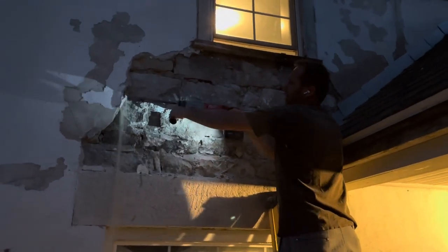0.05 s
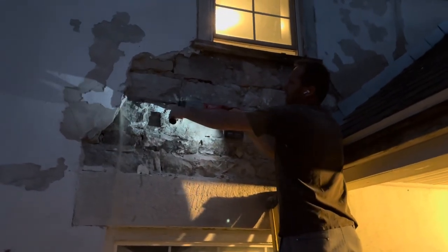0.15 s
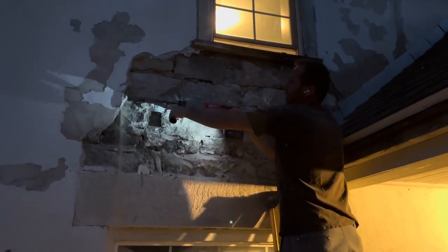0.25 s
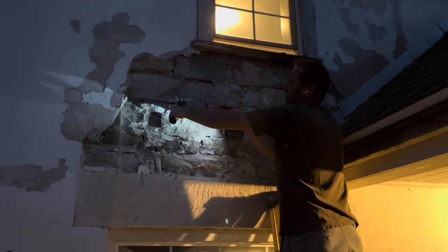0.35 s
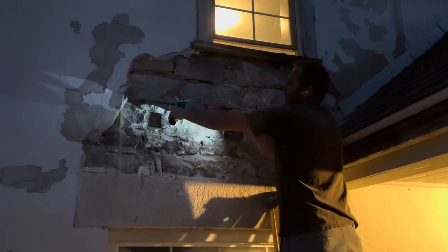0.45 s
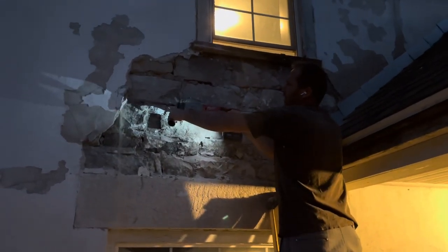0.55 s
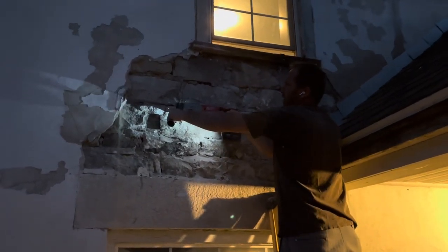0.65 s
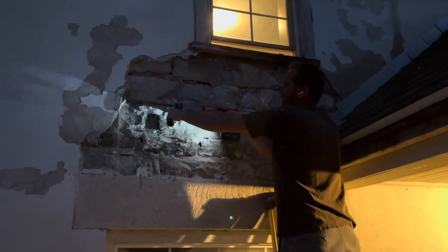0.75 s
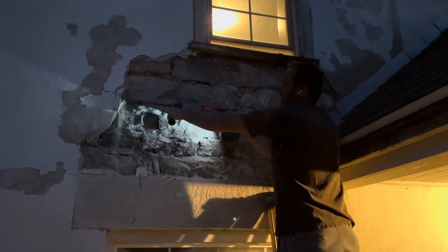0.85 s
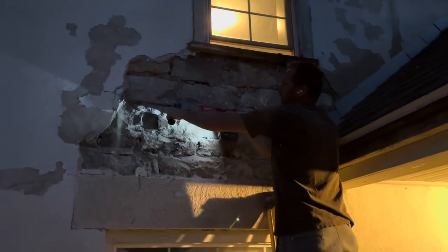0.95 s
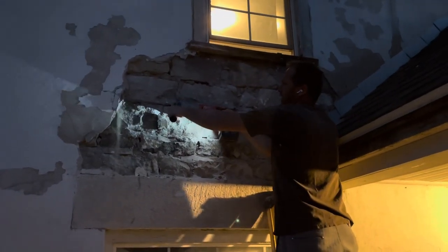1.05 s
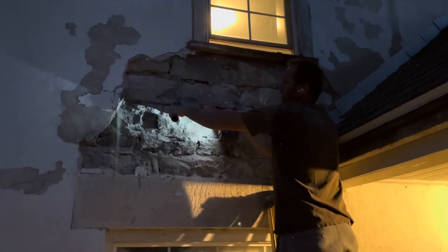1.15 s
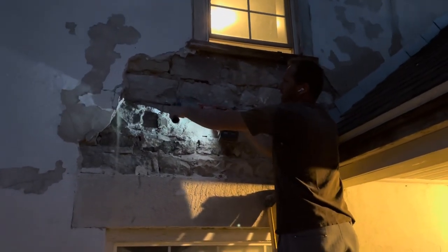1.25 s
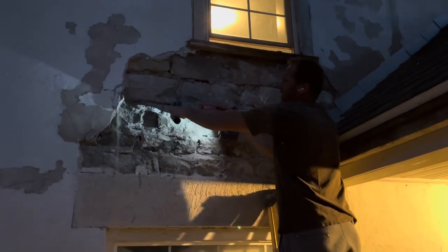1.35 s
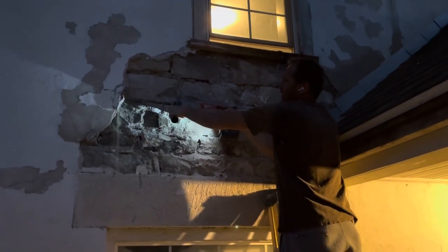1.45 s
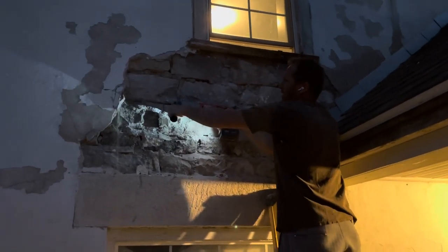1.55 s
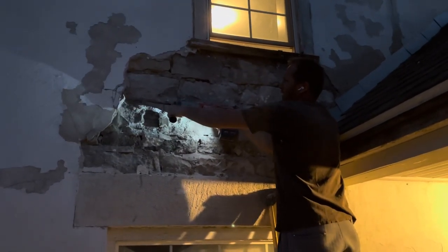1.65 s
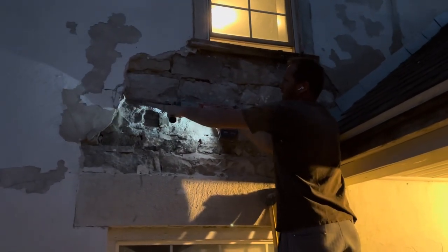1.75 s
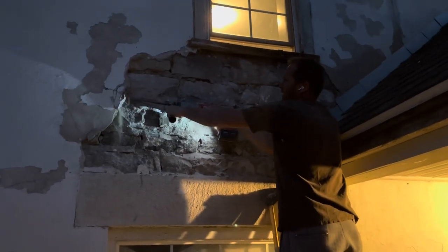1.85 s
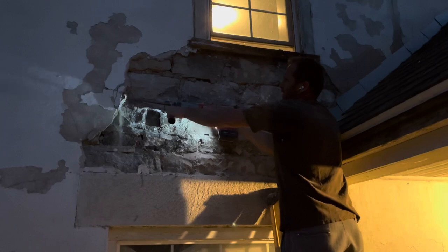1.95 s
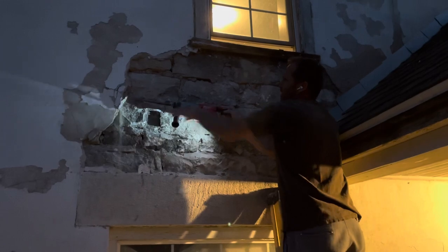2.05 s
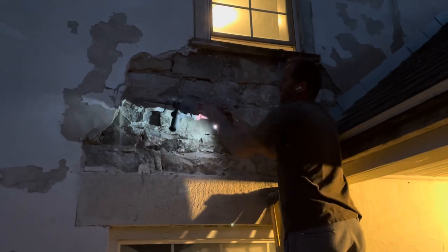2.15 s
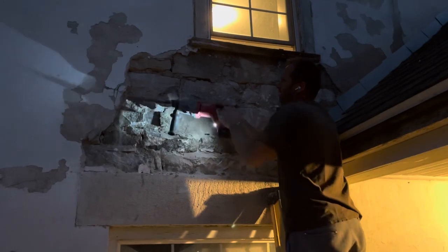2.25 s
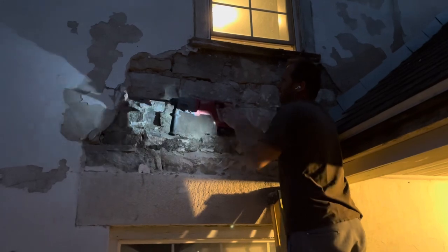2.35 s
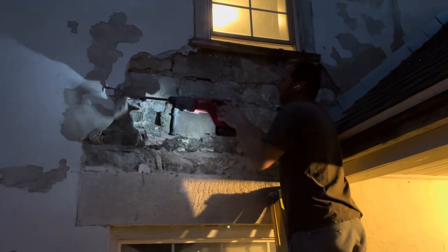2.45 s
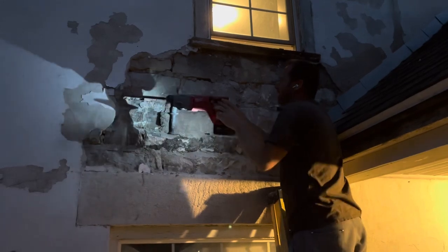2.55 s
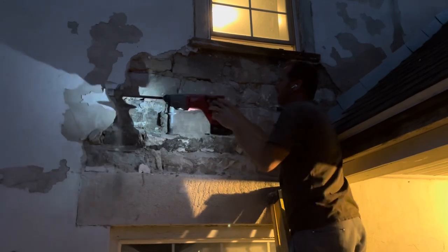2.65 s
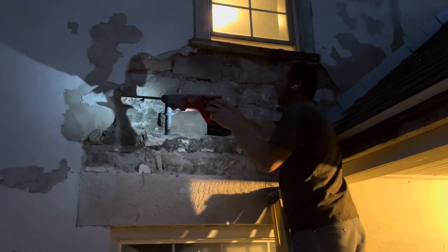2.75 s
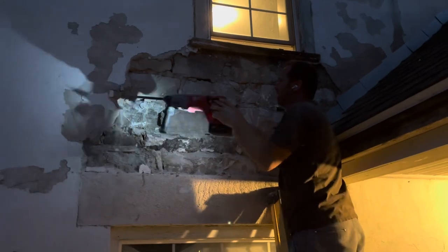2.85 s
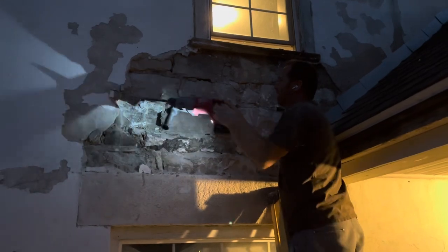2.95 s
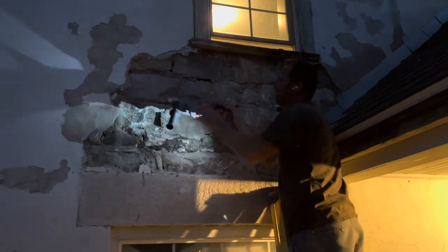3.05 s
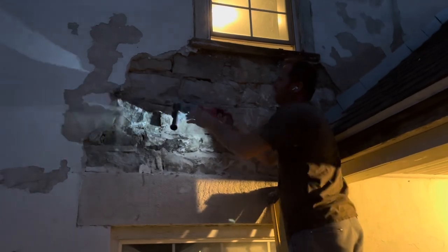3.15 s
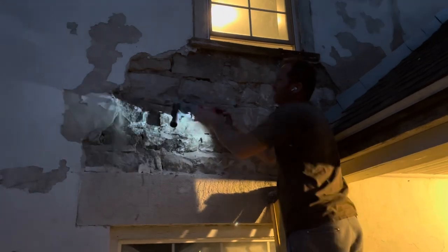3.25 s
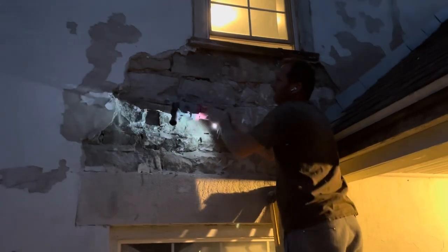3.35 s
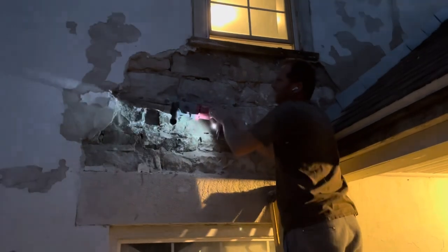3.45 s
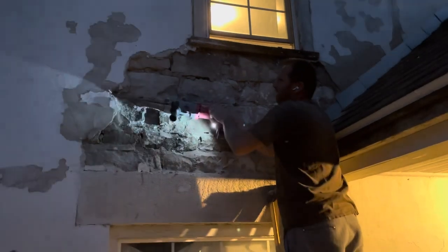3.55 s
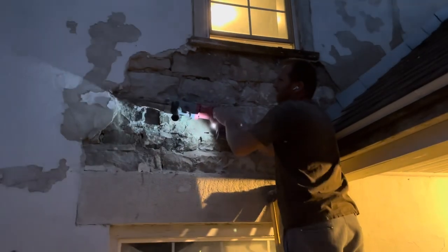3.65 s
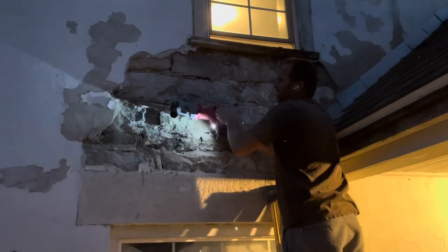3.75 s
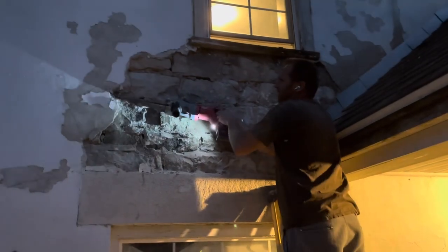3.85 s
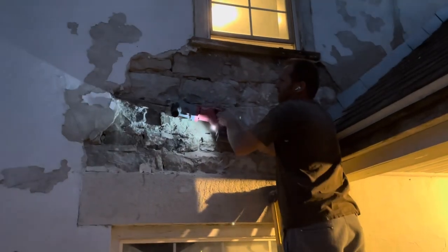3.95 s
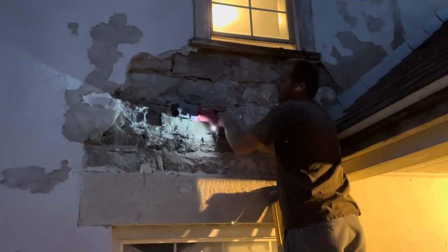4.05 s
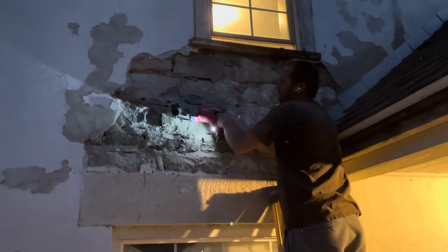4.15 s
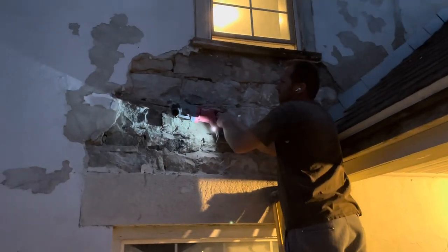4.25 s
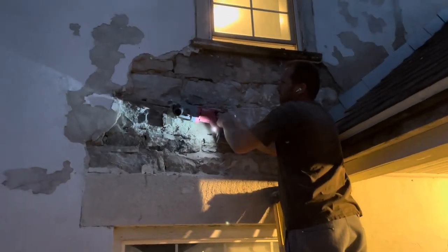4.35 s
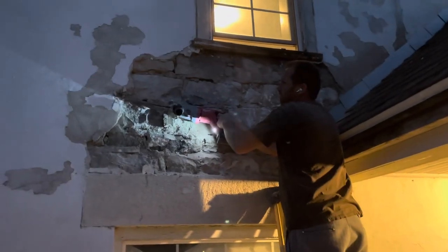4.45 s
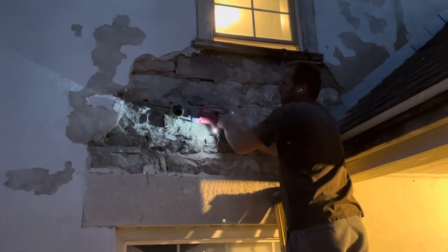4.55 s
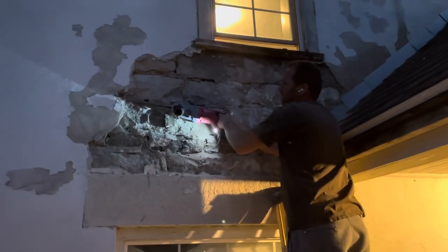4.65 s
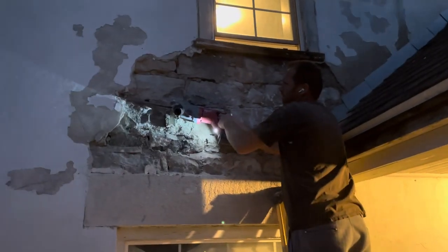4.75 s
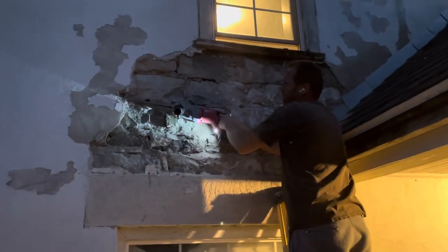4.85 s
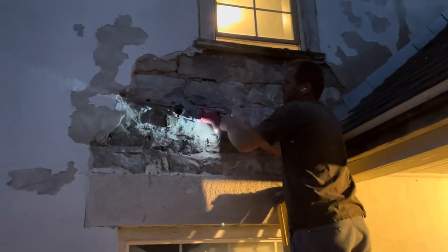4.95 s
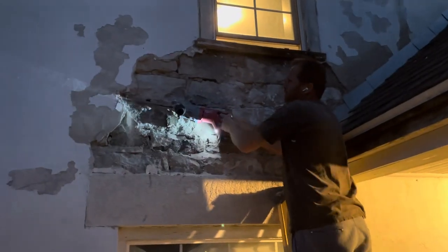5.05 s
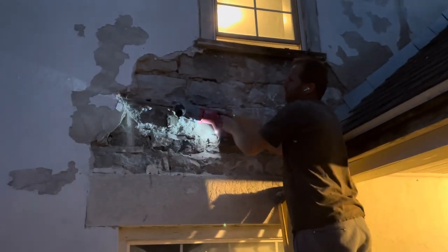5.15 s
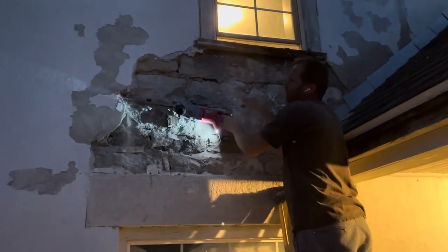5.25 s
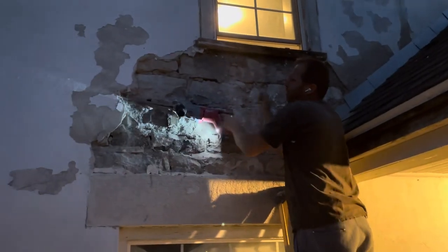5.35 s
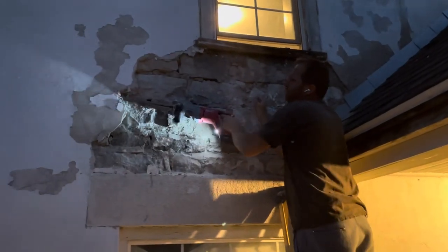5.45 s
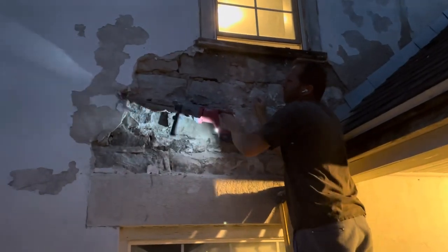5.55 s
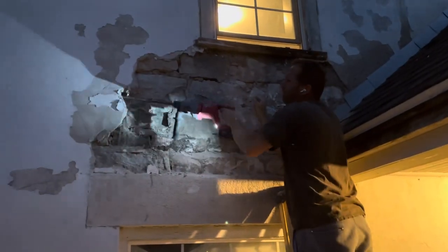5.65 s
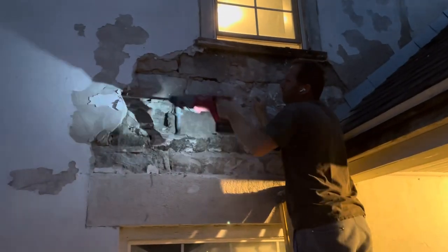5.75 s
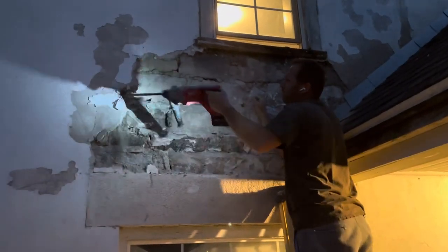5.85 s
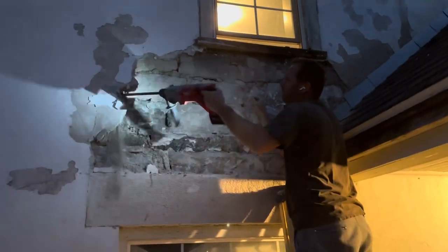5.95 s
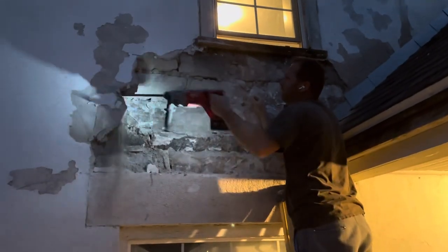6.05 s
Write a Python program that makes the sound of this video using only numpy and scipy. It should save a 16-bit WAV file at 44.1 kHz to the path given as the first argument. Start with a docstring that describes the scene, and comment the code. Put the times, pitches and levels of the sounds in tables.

```python
"""Hammer chisel on a stone house wall

A cordless hammer chisel knocks plaster off the wall in three bursts, about 75 blows a second at full speed.
Each cycle the mechanism clacks, the steel cracks on stone and the tool body thumps, all made of short
impulses and crackles shaped by resonant spectra; on release the crank coasts down in single knocks.
Chips fall and tick in the pauses; a near echo and the yard's short tail answer over a low outdoor rumble.
The sound reaches two microphone ports with slightly different level and phase."""
import sys
import numpy as np
from scipy import signal
from scipy.fft import rfft, irfft, next_fast_len
from scipy.io import wavfile
from scipy.ndimage import uniform_filter1d, map_coordinates

SR = 44100
rng = np.random.default_rng(int(sys.argv[2]) if len(sys.argv) > 2 else 0)


def store_wav(level_fs):
    """Save 16-bit WAV to argv[1]."""
    pcm = np.round(np.clip(np.atleast_2d(level_fs), -1, 1) * 32767)
    wavfile.write(sys.argv[1], SR, pcm.T.astype(np.int16))


N = 269010

# the three pulls of the trigger:
# (pressed [s], released [s], coasting time constant [s], dry friction [blows per second])
TRIGGER_PULLS = [(-.1969, .8101, .1826, 12.52), (1.3302, 1.964, .1767, 11.37),
                 (3.1985, 4.9157, .1917, 17.7)]
# spectrum of the mechanism's clack: (frequency [Hz], relative level [dB])
CLACK_SPECTRUM = [(700, -17), (1400, -0.5), (1650, 1.5), (1900, -4), (2250, -2), (2550, -5.5), (2900, -1),
                  (3400, -2), (4000, -6.5), (6000, -21.5)]
# spectrum of the steel chisel's crack: (frequency [Hz], relative level [dB])
CHISEL_SPECTRUM = [(2500, -54), (4000, -12.5), (4700, -7.5), (5350, -5.5), (5900, -11.5), (6500, -1),
                   (7100, 2.5), (7800, -3.5), (9000, -5.5), (10500, -5), (13000, -54)]
FULL_RATE = 75  # governed speed, blows per second


def amp(db):
    """Decibels to gain."""
    return 10 ** (np.asarray(db) / 20)


def unit(x):
    """Scale to rms 1."""
    return x / np.sqrt(np.mean(x ** 2) + 1e-20)


def along(points, hz):
    """(Hz, value) points read on a log frequency axis."""
    f, v = np.transpose(points)
    return np.interp(np.log(hz + 1), np.log(f + 1), v)


def at(rows, times):
    """Each column of a curve, read at the given times."""
    s, *cols = np.transpose(rows)
    return [np.interp(times, s, c) for c in cols]


def filtered(x, response):
    """x times a complex response of frequency."""
    size = next_fast_len(N + SR // 2)
    return irfft(rfft(x, size) * response(np.fft.rfftfreq(size, 1 / SR)), size)[..., :N]


def ring(x, spectrum, size=8192):
    """x through a causal (minimum-phase) body of unit energy with the given spectrum."""
    cepstrum = irfft(np.log(amp(along(spectrum, np.fft.rfftfreq(size, 1 / SR)))))
    # folding the cepstrum forward makes the body speak at once and then decay
    cepstrum[1:size // 2] *= 2
    cepstrum[size // 2 + 1:] = 0
    body = irfft(np.exp(rfft(cepstrum)))
    return signal.oaconvolve(x, body / np.linalg.norm(body))[:N]


def modes(rows, size=6000):
    """Struck ring of unit energy from (Hz, dB, t60 s) rows: decaying sines."""
    t = np.arange(size) / SR
    sound = sum(amp(db - 60 * t / t60) * np.sin(2 * np.pi * hz * t) for hz, db, t60 in rows)
    return sound / np.linalg.norm(sound)


def place(times, shapes):
    """Sum one short shape per event at its time."""
    index = np.round(np.asarray(times) * SR).astype(int)[:, None] + np.arange(shapes.shape[1])
    inside = (index >= 0) & (index < N)
    return np.bincount(index[inside], shapes[inside], N)


def pushes(times, db):
    """One clean impulse per event."""
    return place(times, amp(db)[:, None])


def bursts(times, db, fresh, rise, decay, tail_db, tail, size=1100):
    """A crackle per contact, its energy set by db: partly a slowly drifting pattern, partly new each time."""
    t = np.arange(size) / SR
    turn = 2 * np.pi * times[:, None] / 5  # the pattern turns once in 5 s
    pattern = np.cos(turn) * rng.standard_normal(size) + np.sin(turn) * rng.standard_normal(size)
    fresh = np.clip(fresh * np.ones(len(times)), 0, 1)[:, None]
    noise = np.sqrt(1 - fresh) * pattern + np.sqrt(fresh) * rng.standard_normal(pattern.shape)
    onset = 1 - np.exp(-(t / rise) ** 2)
    fall = np.exp(-t / decay) + amp(tail_db) * np.exp(-t / tail)
    shapes = noise * onset * fall
    return place(times, shapes * (amp(db) / np.linalg.norm(shapes, axis=1))[:, None])


def glide(row):
    """A short tone that swells, fades and glides, from (s, length s, from Hz, to Hz, dB)."""
    start, length, from_hz, to_hz, db = row
    progress = np.clip((np.arange(N) / SR - start) / length, 0, 1)
    phase = 2 * np.pi * np.cumsum(from_hz + (to_hz - from_hz) * progress) / SR
    swell = np.sqrt(np.abs(np.sin(np.pi * progress)))
    return amp(db) * swell * np.sin(phase)


def wavering(x, speed_hz=45, depth_db=4):
    """x with a quick random wavering of its level."""
    knots = rng.standard_normal(int(N * speed_hz / SR) + 4)
    return x * amp(depth_db * map_coordinates(knots, [np.arange(N) * speed_hz / SR]))


def hammer():
    """The body's thump and the brighter clatter; a skidding tip makes blows at speed differ."""
    # the tip sits firm on stone (0) or skids over crumbling mortar (1): (time [s], skid [0-1])
    skid_curve = [(0, 0.54), (.62, 0.4), (.76, 0.51), (1.45, 0.63), (1.85, 0.55), (1.95, 1), (3.35, 0.84),
                  (3.56, 0.97), (3.68, 0.98), (4.2, 0.78), (4.4, 0.5), (4.8, 0.6), (4.9, 0.79)]
    # the steel tip sings as it glances off hard stone: (middle [s], half length [s], strength [0-1])
    glances = [(1.926, 0.059, 0.84), (3.763, 0.049, 0.7), (4.09, 0.225, 0.92), (4.872, 0.042, 1)]
    # little weight behind the tool as the last burst starts: (time [s], level of the body [dB])
    bearing = [(2.3, 0), (3.2, -12), (3.25, -9), (3.275, -4), (3.31, -1), (3.35, 0.5)]
    # level of the stone's ring, by the spot under the tip: (time [s], level [dB])
    spot = [(.4, -2.5), (.8, -2.5), (1.6, -3.5), (1.87, -3), (1.93, 3.5), (1.98, -3), (2.03, -2.5),
            (3.3, 4), (3.45, 5), (3.65, 5), (3.8, 3.5), (4.15, 3), (4.6, -2)]
    times, rate = blows()
    fast = rate > 62  # blows per second
    skid = np.clip(at(skid_curve, times)[0], 0, 1)
    glance = sum(strength * np.exp(-((times - s) / half) ** 2) for s, half, strength in glances)
    level = strengths(times, rate, skid, glance)
    for part in ("thump", "knock", "housing", "stone"):
        level[part] = level[part] + at(bearing, times)[0]
    level["stone"] = level["stone"] + at(spot, times)[0]

    def scatter(db):
        """Random level change of each blow, for a skidding tip at speed."""
        return db * skid * fast * rng.standard_normal(len(times))

    slip = skid ** 2  # share of each blow that is new
    times = times + .00007 * slip * rng.standard_normal(len(times))
    # while the tip skids, the blows also drift off the beat together
    drift = unit(uniform_filter1d(rng.standard_normal(len(times)), size=5))
    times = times + .00008 * slip * drift
    thump = body_thump(times, rate, level, slip, scatter)
    clatter = casing(times, fast, level["housing"], scatter)
    clatter += stone(times, level["stone"], slip, scatter)
    clatter += shank(times, level["clack"], skid, scatter)
    clatter += clack(times, fast, level["clack"], slip, scatter)
    clatter += chisel(times, level["chisel"], slip, scatter)
    clatter += seated(times, level["chisel"] + scatter(2.2))
    clatter += chatter(times[fast], skid[fast])
    clatter += singing(times)
    clatter += grit(times, fast, level["grit"], skid, scatter)
    clatter += tip_song(times, level["grit"], glance)
    return thump, clatter


def blows():
    """Time and crank speed of each blow: the motor spins up, is governed, then coasts against friction."""
    # governed speed, sagging a little in soft mortar: (time [s], speed [blows per second])
    cruise = [(.8, 74.987), (1.5, 75.026), (3.3, 74.4), (4.2, 74.4), (4.4, 75.03)]
    free_rate, spin_up_s = 109, .113  # ungoverned blows per second, time constant
    times, rates = [], []
    for pressed, released, coast, friction in TRIGGER_PULLS:
        t = np.arange(pressed, released + .5, 1 / SR)
        spin_up = free_rate * (1 - np.exp((pressed - t) / spin_up_s))
        driven = np.minimum(at(cruise, t)[0], spin_up)
        slowing = np.exp(-np.maximum(t - released, 0) / coast)
        rate = np.maximum((driven + friction) * slowing - friction, 0)
        strikes = np.flatnonzero(np.diff(np.floor(np.cumsum(rate) / SR)))  # one blow per crank turn
        strikes = strikes[t[strikes] > 0]
        times.append(t[strikes])
        rates.append(rate[strikes])
    return np.concatenate(times), np.concatenate(rates)


def strengths(times, rate, skid, glance):
    """Level (dB) that each blow gives to every part: more with force, less as the crank slows."""
    # how hard the tool is leant on, as the level of its clatter, a list per burst: (time [s], level [dB])
    force = [
        [(0.02, -35.5), (0.094, -37), (0.214, -34), (0.526, -35), (0.786, -35), (0.79, -34.5)],
        [(1.47, -30), (1.496, -31), (1.926, -31.5), (1.96, -31)],
        [(3.33, -30.5), (3.396, -31.5), (4.728, -27.5), (4.91, -29)],
    ]
    # each part in a blow: (level at usual force [dB], gain per force [dB per dB], change at full skid [dB],
    # loss per halving of speed [dB], change in a full glance [dB], share of the seating loss)
    response = { "shake": (-21.5, 0.56, 8, 7.5, -0.5, 3), "thump": (-4, 1.15, 0.45, 5.5, -0.5, 2),
                "knock": (-6.5, 2.5, -4.5, 3, -7, 2.3), "housing": (-8.5, 0.5, 3.5, 4.5, 0, -0.5),
                "stone": (-9, 0.52, 1.5, 4.5, 5, 1), "clack": (-4, 1.02, -1.5, 2.5, 0.5, 7),
                "chisel": (-2, 0.74, -5, 1.5, -7, 1.3), "grit": (-11, 0.82, -0.5, 1.44, 2.5, 2.5), }
    # how squarely the tip meets the wall, chiefly as the tool coasts down: (time [s], level [dB])
    contact = [(.79, 1.5), (.825, -3), (.87, -1), (.912, -0.5), (.942, 1.5), (.98, -2), (1.035, 4.5),
               (1.33, -0.5), (1.98, 0), (2.03, -2), (2.1, -0.5), (2.14, 0), (2.2, 3), (3.2, 0), (4.95, 0),
               (5.0, 0), (5.057, 1.5), (5.104, 3)]
    usual_force_db = -32
    stall_rate, stall_loss_db = 20.44, 15  # below this rate the piston hardly throws the striker
    seat_loss_db, seat_s = 34.5, 0.01693  # weak until the chisel seats: loss at the trigger, time constant
    force_db = at(np.vstack(force), times)[0] - usual_force_db
    halvings = np.log2(FULL_RATE / rate)
    stall_db = stall_loss_db / (1 + (rate / stall_rate) ** 10)
    seat_db = sum(seat_loss_db * np.exp(-np.abs(times - pressed) / seat_s)
                  for pressed, _, _, _ in TRIGGER_PULLS)
    shared_db = at(contact, times)[0] - stall_db
    level = {}
    for part, (db, per_force, skid_db, slow_db, glance_db, seating) in response.items():
        handling_db = per_force * force_db + skid_db * skid + glance_db * glance
        level[part] = db + handling_db - slow_db * halvings + shared_db - seating * seat_db
    return level


def grip_levels(times):
    """Housing, barrel and shake levels (dB) as the grip damps the parts of the tool by turns."""
    # (time [s], housing level [dB], barrel level [dB], shake level [dB])
    grip = [(.25, 4, 0, 0.5), (.78, .5, -3, 0), (1.46, -0.5, -3, .5), (1.58, -3, -6.5, 2),
            (1.75, -7, -1, 2.5), (1.88, 0, -4, 0.5), (1.99, 0, -2.5, 2), (3.36, 3.5, -1, 0.5),
            (3.52, .5, 0.5, -4), (3.7, -0.5, -5, -3), (3.8, -2, -2.5, -2), (4.1, -4, -5, 1.5),
            (4.22, -4, -6, -1.5), (4.45, -2.5, -1.5, -2.5), (4.78, -8, -3.5, -6), (4.9, -2.5, -3.5, -3)]
    return at(grip, times)


def body_thump(times, rate, level, slip, scatter):
    """The tool's body answers just after the blow: a thump, a rattle, a low shake and a hollow knock."""
    # spectra of thump and shake: (frequency [Hz], relative level [dB])
    thump_spectrum = [(150, -45), (300, -25), (375, -1), (450, 4), (525, 4), (600, 4), (675, -4),
                      (750, -0.5), (825, -5.5), (950, -34.5), (1400, -67)]
    shake_spectrum = [(20, -60), (45, -33), (75, -11), (150, -6), (225, 0.5), (300, 0.5), (380, -10),
                      (600, -49)]
    recoil = times + .0008
    rattle = bursts(recoil, level["thump"] - 10.0, 0.11 + slip, 0.0019, 0.036, -6.5, 0.036)
    thump = ring(pushes(recoil, level["thump"] + scatter(0.25)) + rattle, thump_spectrum)
    shake_grip_db = grip_levels(times)[2]
    # the grip is read at the blow, the shake follows with the recoil
    shake = ring(pushes(recoil, level["shake"] + shake_grip_db + scatter(1.0)), shake_spectrum)
    return thump + shake + knocks(times, rate, level["knock"]) + drumming(recoil)


def knocks(times, rate, level_db):
    """Below full speed the striker lands slack and knocks hollowly."""
    # spectrum of the knock: (frequency [Hz], relative level [dB])
    knock_spectrum = [(150, -47.5), (300, -21), (520, -9.5), (600, -10), (632, 5.5), (670, -6.5),
                      (790, -4.5), (1000, -15.5), (2000, -36.5), (6000, -74)]
    # the high power makes the knock vanish steeply towards full speed
    slack = np.clip(1 - (rate / FULL_RATE) ** 12, 1e-3, 1)
    return ring(pushes(times, level_db + 20 * np.log10(slack)), knock_spectrum)


def drumming(recoil):
    """A patch of loose plaster drums deeply under the blows."""
    # (from [s], to [s], level [dB])
    hollow = (1.5, 1.92, -20)
    # spectrum of the drumming: (frequency [Hz], relative level [dB])
    drum_spectrum = [(30, -37), (60, -11), (75, -4.5), (95, -5), (150, -22.5), (300, -29)]
    start, end, db = hollow
    loose = recoil[(recoil > start) & (recoil < end)]
    return ring(pushes(loose, np.full(len(loose), db)), drum_spectrum)


def casing(times, fast, level_db, scatter):
    """Housing and barrel ring; at speed the piston's push sets them off just before the blow."""
    # spectra of housing and barrel: (frequency [Hz], relative level [dB])
    housing_spectrum = [(500, -56.5), (750, -5.5), (825, -0.5), (895, 5), (945, -9.5), (1050, -22),
                        (1600, -52.5)]
    barrel_spectrum = [(500, -65), (800, -38), (935, -5.5), (972, -5), (1010, -9), (1200, -39),
                       (2000, -64.5)]
    scatter_db = 1.8
    housing_grip_db, barrel_grip_db, _ = grip_levels(times)
    push = times - 0.001 * fast
    housing = ring(pushes(push, level_db + housing_grip_db + scatter(scatter_db)), housing_spectrum)
    barrel = ring(pushes(push, level_db + barrel_grip_db + scatter(scatter_db)), barrel_spectrum)
    return housing + barrel


def stone(times, level_db, slip, scatter):
    """Each blow rings the stone, as a clean impulse and a short crackle."""
    # spectrum of the stone: (frequency [Hz], relative level [dB])
    stone_spectrum = [(600, -35), (950, -13.5), (1050, 2.5), (1112, 7.5), (1200, -5), (1270, 2.5),
                      (1350, -19.5), (1425, -1), (1550, -23), (2500, -55.5)]
    impulse = pushes(times, level_db - 8.0 + scatter(0.91))
    crackle = bursts(times, level_db - 3.5, .5 * slip, 0.0001, 0.0017, -1.6, 0.0058)
    return ring(impulse + crackle, stone_spectrum)


def shank(times, level_db, skid, scatter):
    """The blow rings the bending modes of the chisel shank."""
    # (frequency [Hz], relative level [dB], t60 [s])
    shank_modes = [(1280, -5.5, 0.039), (1385, 2, 0.047), (1660, -5.5, 0.035), (1812.3, 0, 0.068),
                   (2534, 2, 0.05), (2670, 6, 0.035), (2747, -1.5, 0.049), (5180, 3.5, 0.0075),
                   (7630, -10, 0.014)]
    return signal.oaconvolve(pushes(times, level_db - 7 - skid + scatter(2.2)), modes(shank_modes))[:N]


def clack(times, fast, level_db, slip, scatter):
    """The mechanism clacks; at speed the piston clacks twice before the striker lands."""
    landing_db = level_db - 3 - 3.55 * fast + scatter(0.59)
    sound = bursts(times, landing_db, 0.044 + 1.1 * slip, 0.000078, 0.0025, -1.8, 0.013)
    piston_db = (level_db + scatter(2.1))[fast]
    sound += bursts(times[fast] - .0013, piston_db - 5.5, slip[fast], .0001, 0.00054, -13.0, 0.0048)
    sound += bursts(times[fast] - .0033, piston_db - 5.0, slip[fast], .0001, 0.0002, -16.5, 0.012)
    return ring(sound, CLACK_SPECTRUM)


def chisel(times, level_db, slip, scatter):
    """The steel's bright crack decays within about a millisecond, over a weak tail."""
    crack = bursts(times, level_db + 3 + scatter(1.4), .1 + slip, .0005, .0006, -21, .005)
    return ring(crack, CHISEL_SPECTRUM)


def seated(times, level_db):
    """The narrow rings of steel and wall while the tip is held against one stone."""
    # (from [s], to [s], pitch [Hz], half width [share of the pitch], level [dB])
    seats = [(0, .93, 2047, 0.0352, -13), (0, .93, 2750, 0.056, -16.5), (0, .93, 6660, 0.0897, 0.5),
             (1.44, 2.0, 1188, 0.013, -16), (1.44, 2.0, 2052, 0.017, -15), (1.44, 2.007, 2544, 0.011, -16),
             (1.44, 2.0, 2730, 0.0233, -21), (1.44, 2.11, 5300, 0.0457, -12.5),
             (3.2, 3.43, 6930, 0.032, -1), (4.12, 4.85, 1401, 0.028, -7), (4.295, 4.85, 1660, 0.029, -12.5),
             (4.349, 4.85, 2175, 0.0237, -14.5), (4.144, 4.95, 5370, 0.054, -4),
             (4.33, 4.85, 7800, 0.065, -1.5), (4.36, 4.84, 11280, .06, -2)]
    sound = np.zeros(N)
    for start, end, hz, width, db in seats:
        held = (times > start) & (times < end)
        peak = [(hz * (1 + k * min(width, .2)), -5 * k * k) for k in (-4, -1, 0, 1, 4)]
        sound += ring(pushes(times[held], level_db[held] + db), peak)
    return sound


def chatter(times, skid, count=3):
    """A skidding chisel chatters in its holder at random moments of each cycle."""
    when = (times[:, None] + rng.random((len(times), count)) / FULL_RATE).ravel()
    db = np.repeat(20 * np.log10(skid ** 2 + 1e-3), count)

    def contacts():
        """Short crackles of loose contact, new each time."""
        return bursts(when, db - 11.5, 1, .0002, .0012, -14, .005)

    dull = ring(contacts(), CLACK_SPECTRUM)
    bright = ring(contacts(), CHISEL_SPECTRUM)
    return dull + bright


def singing(times):
    """While it hangs loose, the blows keep one bending mode of the shank going, each with new phase."""
    # (from [s], to [s], frequency [Hz], t60 [s], level of each blow [dB])
    sing = (3.65, 5.0, 2546, 0.25, -12.5)
    start, end, hz, t60, db = sing
    loose = times[(times > start) & (times < end)]
    kicks = bursts(loose, np.full(len(loose), db), 1, .0001, .001, -20, .003)
    return signal.oaconvolve(kicks, modes([(hz, 0, t60)]))[:N]


def grit(times, fast, level_db, skid, scatter):
    """A gritty treble crackle on each blow, and at speed another just before it."""
    # spectrum of the grit: (frequency [Hz], relative level [dB])
    grit_spectrum = [(7000, -10.5), (10000, 6.5), (11300, 8.5), (12600, 3.5), (13700, 8), (14400, -19.5),
                     (15200, -14), (16300, -32)]
    sound = bursts(times, level_db + 1 + scatter(2), .6 + skid, .0005, .0005, -21, .005)
    sound += bursts(times[fast] - .0018, level_db[fast] - 0.5, 1.0, 0.0012, 0.0011, -10.5, 0.013)
    return ring(sound, grit_spectrum)


def tip_song(times, grit_db, glance):
    """The steel tip sings high in the treble, much louder while it glances off hard stone."""
    # spectrum of the tip: (frequency [Hz], relative level [dB])
    tip_spectrum = [(12000, -44.5), (13300, 2), (13700, 5), (14100, -11), (15500, -36)]
    song_db = grit_db - 12 + 21 * glance
    return ring(bursts(times, song_db, 0.41, 0.00041, 0.00046, -23.5, 0.0059), tip_spectrum)


def motor():
    """Gears and fan, as shaped noise, whirr up at the trigger and fade after its release."""
    # spectrum of the whirr: (frequency [Hz], relative level [dB])
    whirr_spectrum = [(300, -20), (700, -10), (1500, -11), (2300, -11), (2800, -2), (3050, 4.5), (3450, -2),
                      (3700, -5), (4200, -13), (6000, -22), (7000, -14), (7700, -22), (15000, -32)]
    lag_s, rise_s, fade_db_per_s = .001, 0.014, 85
    t = np.arange(N) / SR
    level = np.zeros(N)
    for pressed, released, _, _ in TRIGGER_PULLS:
        rise = (1 - np.exp(-np.maximum(t - pressed - lag_s, 0) / rise_s)) ** 2
        level += rise * amp(-fade_db_per_s * np.maximum(t - released, 0))
    return amp(-43) * level * unit(ring(rng.standard_normal(N), whirr_spectrum))


def run_out(count=7):
    """After each release the motor's whine falls, then the gears tick faintly to a stop."""
    # the whine: (delay after release [s], length [s], from [Hz], to [Hz], level before wavering [dB])
    whine_row = (.185, .115, 915, 860, -58.5)
    # spectrum of the ticks: (frequency [Hz], relative level [dB])
    gear_spectrum = [(5500, -32), (6600, 3), (7000, 5), (7300, -11), (8200, -41.5)]
    first_tick_s, spacing_s, first_db, loss_per_tick_db = 0.28, 0.027, -46, 0.5
    delay, *whine = whine_row
    k = np.arange(count)
    sound = np.zeros(N)
    for _, released, _, _ in TRIGGER_PULLS:
        sound += wavering(glide((released + delay, *whine)))
        ticks = released + first_tick_s + spacing_s * (k + rng.uniform(-.3, .3, count))
        sound += ring(pushes(ticks, first_db - loss_per_tick_db * k), gear_spectrum)
    return sound


def taps():
    """The tip is set against the wall and bounces: a compact clack of steel on stone."""
    # (time [s], level [dB])
    tap_rows = [(3.0714, -23), (3.0754, -7), (3.086, -28), (3.097, -27)]
    # (frequency [Hz], relative level [dB], t60 [s])
    tap_modes = [(972, -8, 0.028), (1063, 13, 0.019), (1240, 1.5, 0.022), (2030, -11, .03),
                 (3170, -20, .05), (3350, -8, .05)]
    s, db = np.transpose(tap_rows)
    return signal.oaconvolve(pushes(s, db), modes(tap_modes))[:N]


def bumps():
    """Plaster lumps and stone shards knock, and the coasting hammer lands one last blow at 5.18 s: a stony
    crunch and the short ring of the piece hit."""
    # (time [s], nominal peak [dB], pitch [Hz], ring against crunch [dB], crunch time constant [s]); the row at
    # 5.176 s is the hammer's last coasting blow
    bump_rows = [(3.072, -19, 1150, -23, 0.0099), (3.185, -32, 660, 3, 0.022),
                 (5.176, -31, 626, 5.5, 0.0122), (5.597, -41, 1230, 6, 0.0016),
                 (5.613, -33, 2090, 9.5, 0.0016), (5.623, -44, 2090, 0, .004)]
    # spectrum of the crunch: (frequency [Hz], relative level [dB])
    lump_spectrum = [(80, -14), (300, -3), (1000, 0), (1400, -1), (2200, -8), (3500, -7), (7000, -14),
                     (15000, -25)]
    # ring of a shard: (multiple of its pitch, relative level [dB], t60 [s])
    shard_modes = [(.45, -13, .018), (.62, -12, .015), (1, 5, 0.028), (1.16, -11, .02), (1.93, -3, .012),
                   (2.07, 5, 0.0152)]
    s, db, _, _, length = np.transpose(bump_rows)
    crunch = ring(bursts(s, db + 13.5, 1.0, 0.000091, length[:, None], -21, 0.018), lump_spectrum)
    clinks = []
    for _, peak_db, hz, ring_db, _ in bump_rows:
        shard = modes([(k * hz, level, t60) for k, level, t60 in shard_modes])
        clinks.append(amp(peak_db + 8 + ring_db) * shard)
    return crunch + place(s, np.array(clinks))


def chips(count=90):
    """Chips tick on the ground, amid a trickle of fine crumbs at random times."""
    # small chips landing: (time [s], nominal peak [dB])
    chip_rows = [(2.4311, -53.5), (2.6635, -41.5), (2.701, -50), (2.796, -48.5), (2.953, -54), (5.16, -47),
                 (5.413, -57), (5.453, -54), (5.572, -48), (5.738, -51), (5.8008, -58), (6.0256, -56),
                 (6.065, -44)]
    # spectrum of a chip: (frequency [Hz], relative level [dB])
    chip_spectrum = [(800, -4.5), (2500, -16.5), (5000, -7), (7500, 0.5), (11000, 6.5), (16000, -14)]
    s, db = np.transpose(chip_rows)
    ticks = bursts(s, db + 19.5, 0.68, .0001, 0.00117, -8, 0.0077)
    when, size = rng.random((count, 2)).T
    crumbs = bursts(when * N / SR, -56 + 13 * size, 0.84, .0001, .0006, -26.5, .006)
    return ring(ticks + crumbs, chip_spectrum)


def rustle(count=2500):
    """Sleeve and grip rustle as the tool is shifted: dense soft grains under short swells."""
    # (middle [s], half length [s], level [dB])
    rustle_rows = [(5.5, 0.12, -68), (5.694, 0.15, -69.5), (5.9, 0.041, -70)]
    # spectrum of rubbing cloth: (frequency [Hz], relative level [dB])
    cloth_spectrum = [(500, -8), (1500, -8.5), (2500, -2), (3300, -2), (4200, -9), (8000, -14),
                      (15000, -21)]
    t = np.arange(N) / SR
    when, size = rng.random((count, 2)).T
    grains = unit(ring(bursts(when * N / SR, 12 * size, 1, .0004, .002, -20, .005), cloth_spectrum))
    return grains * sum(amp(db) * np.exp(-((t - s) / half) ** 2) for s, half, db in rustle_rows)


def squeak():
    """The tip slips on stone: short gliding partials sound as one squeak."""
    # a row per partial: (time [s], length [s], from [Hz], to [Hz], level [dB])
    partials = [(6.061, .021, 1655, 1680, -55), (6.062, .015, 3100, 3900, -56),
                (6.062, .014, 4500, 5600, -56)]
    return sum(glide(row) for row in partials)


def hum():
    """A faint short wavering tone in the first pause."""
    # (time [s], length [s], from [Hz], to [Hz], level before wavering [dB])
    hum_row = (1.15, .16, 600, 595, -63)
    return wavering(glide(hum_row))


def ports(x):
    """Direct sound reaches the two microphone ports with different phase and level."""
    # (frequency [Hz], left minus right [dB])
    level_difference = [(60, 0.5), (110, 2), (200, -2.5), (380, 1.5), (700, 4.5), (1290, 3), (2380, 2.5),
                        (4400, 6.5), (8120, 0), (15000, -0.5)]
    # (frequency [Hz], phase by which the left port leads [rad])
    phase_lead = [(0, 0), (300, .2), (1400, .9), (2100, .6), (3400, 1.6), (4400, .9), (5300, 0),
                  (6800, -1.3), (7600, -2.3), (9000, -3.1), (10200, -3.9), (12000, -5.6), (13200, -6.2)]
    half = np.array([[.5], [-.5]])
    return filtered(x, lambda hz: amp(half * along(level_difference, hz))
                    * np.exp(1j * half * along(phase_lead, hz)))


def yard(x):
    """Diffuse answer of the walls, different at each port: noise decaying at its own rate in each band."""
    # (frequency [Hz], t60 [s])
    decay_times = [(100, 0.5), (500, 0.33), (1500, 0.49), (5000, 0.24), (8000, 0.05), (14000, 0.15)]
    side_spectrum = [(200, -4.5), (1000, -0.5), (3000, 0.0), (10000, 7.5), (14000, -10.0)]  # (Hz, dB)
    hz, t, z = signal.stft(rng.standard_normal((2, SR)), SR, nperseg=256)
    decay = amp(-60 * t / along(decay_times, hz)[:, None]) * (1 - np.exp(-t / 0.00063))
    tail = signal.istft(z * decay, SR, nperseg=256)[1]
    mid, side = signal.fftconvolve(x[None], tail / np.linalg.norm(tail[0]), axes=1)[:, :N]
    side = filtered(side, lambda hz: amp(along(side_spectrum, hz)))
    return np.array([mid + side, mid - side])


def outdoors():
    """A distant low rumble, alike at both ports, under faint hiss that differs between them."""
    # spectrum of the background: (frequency [Hz], relative level [dB])
    air_spectrum = [(15, -67.5), (25, -46), (47, -1.5), (80, 4), (317, -15.5), (405, -18), (560, -18.5),
                    (607, -16), (695, -20), (887, -15.5), (1650, -22), (2760, -34), (8360, -41.5),
                    (11300, -31), (16000, -56.5)]
    # its course, raised by 3 dB below: (time [s], nominal level [dB])
    background_level = [(1.1, -61), (2.5, -60.5), (5.3, -59), (6.1, -61)]
    side_spectrum = [(100, -19.5), (500, -0.5), (2000, -4.5), (9000, 5.0), (14000, -0.5)]  # (Hz, dB)
    mid, side = [unit(ring(noise, air_spectrum)) for noise in rng.standard_normal((2, N))]
    side = filtered(side, lambda hz: amp(along(side_spectrum, hz)))
    level_db = at(background_level, np.arange(N) / SR)[0] + 3.0
    return amp(level_db) * np.array([mid + side, mid - side])


def scene():
    """Tool and debris, with one near reflection, the yard's tail and the outdoor background."""
    thump, clatter = hammer()
    tool = clatter + motor() + run_out()
    debris = taps() + bumps() + chips() + rustle() + squeak() + hum()
    # the near reflection comes 10.3 ms late
    echo = filtered(tool + debris, lambda hz: amp(-15.0) * np.exp(-2j * np.pi * hz * .0103))
    direct = ports(thump + tool + debris + echo)
    tail = yard(amp(-15.5) * thump + amp(-11.5) * tool + amp(-15.0) * debris)
    return direct + tail + outdoors()


def record(dry):
    """The recorder drops the deepest bass and keeps nothing above its band limit."""
    top_hz = 16500
    return filtered(dry, lambda hz: hz ** 4 / (hz ** 4 + 32 ** 4) * np.clip((top_hz - hz) / 600, 0, 1))


dry = scene()
out = record(dry)
store_wav(out)
```